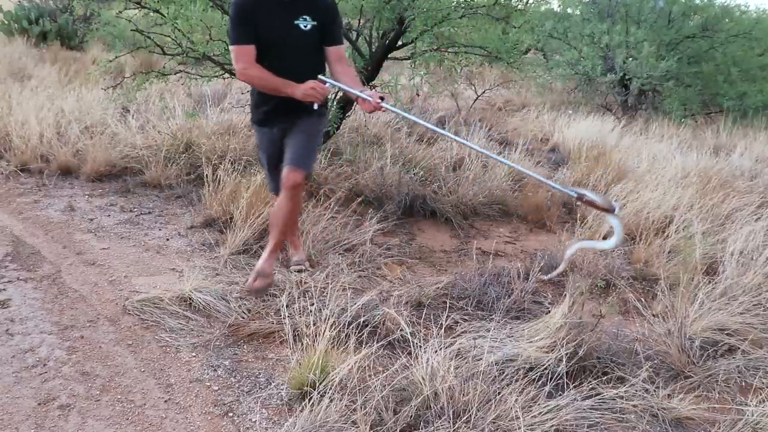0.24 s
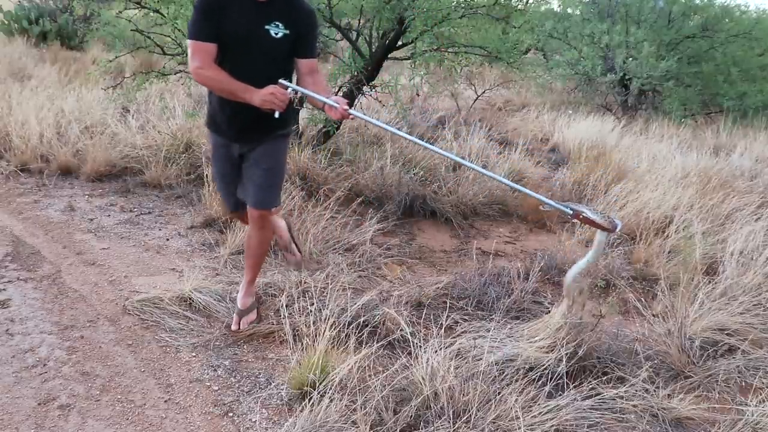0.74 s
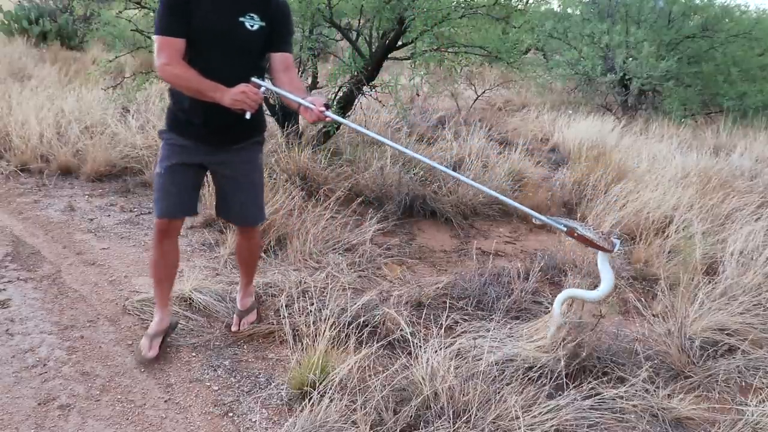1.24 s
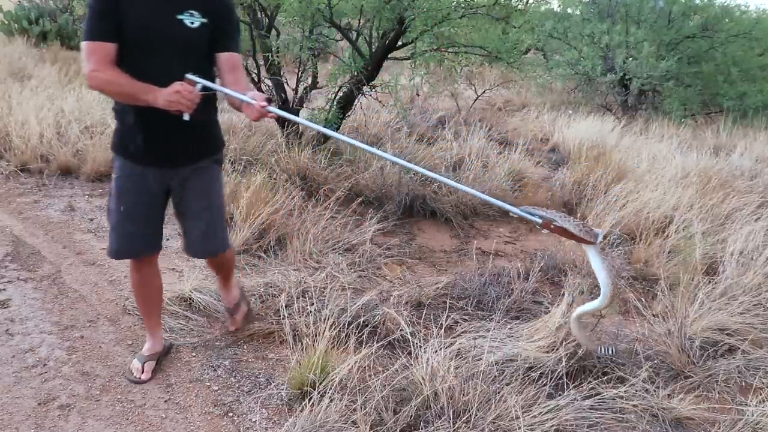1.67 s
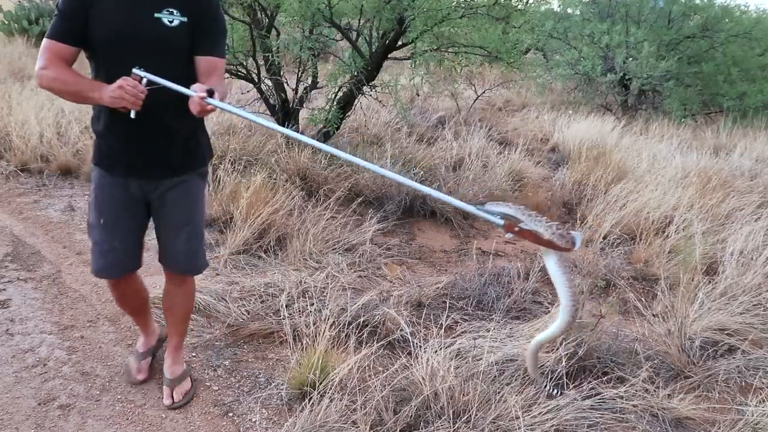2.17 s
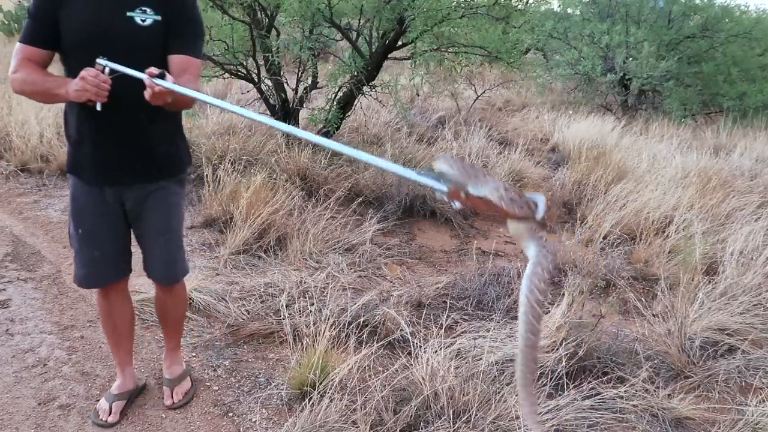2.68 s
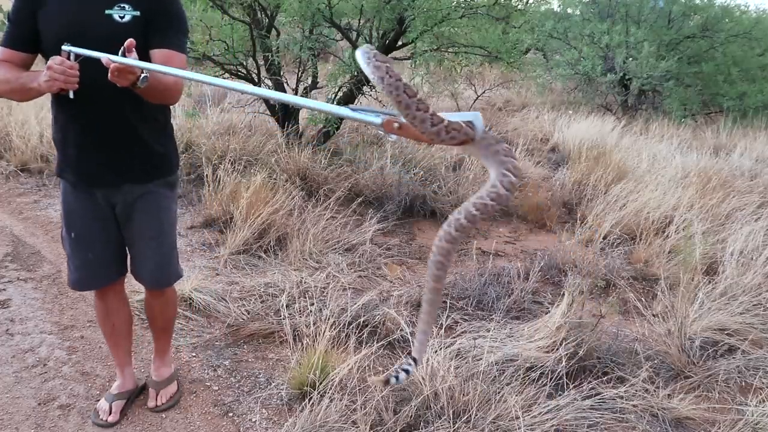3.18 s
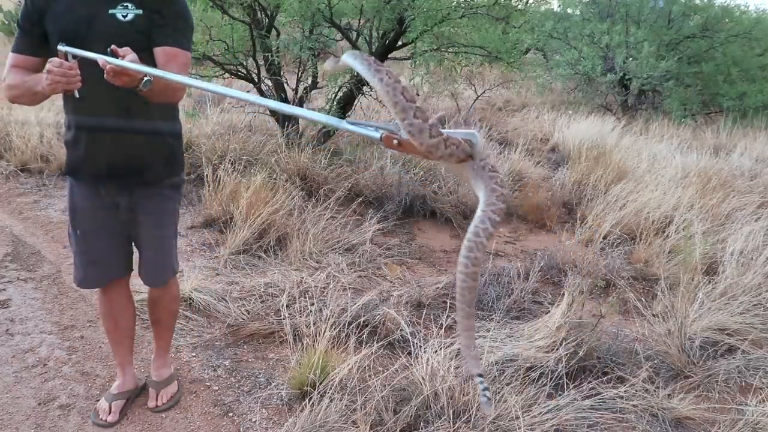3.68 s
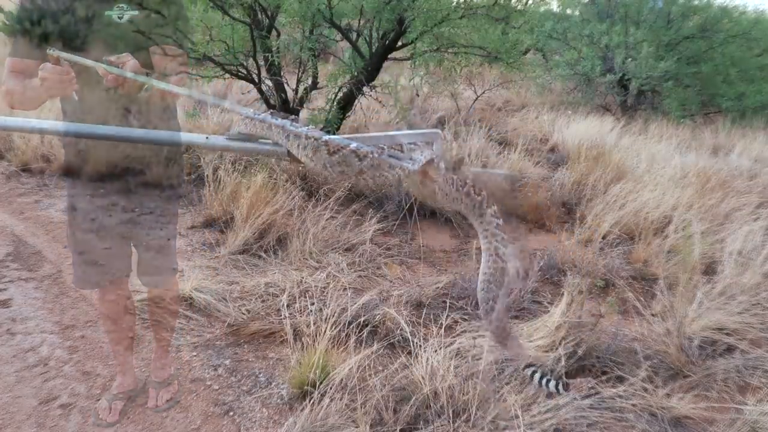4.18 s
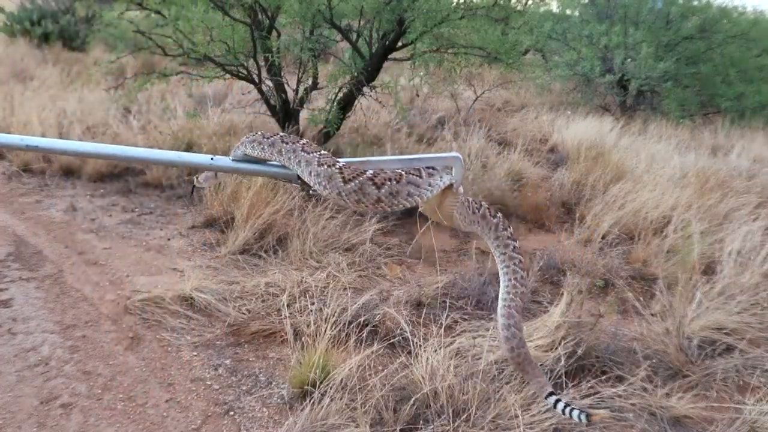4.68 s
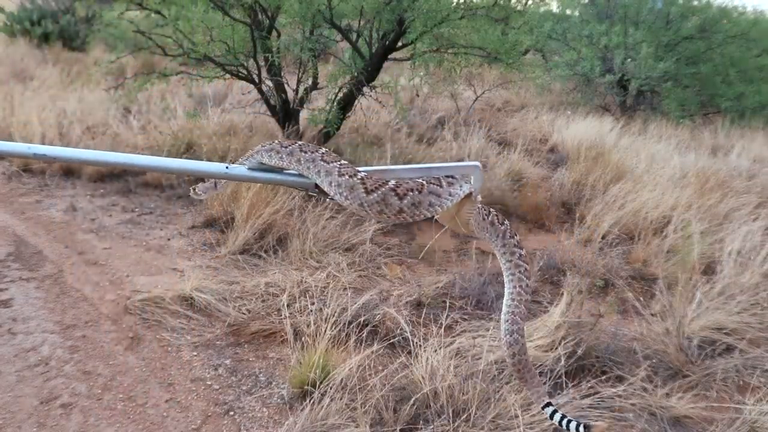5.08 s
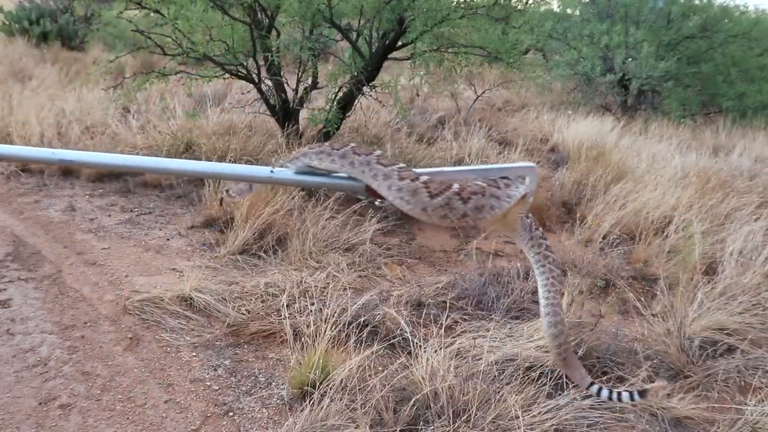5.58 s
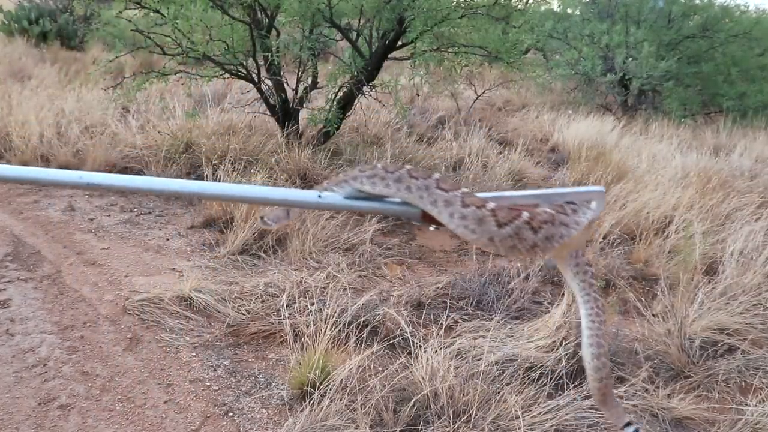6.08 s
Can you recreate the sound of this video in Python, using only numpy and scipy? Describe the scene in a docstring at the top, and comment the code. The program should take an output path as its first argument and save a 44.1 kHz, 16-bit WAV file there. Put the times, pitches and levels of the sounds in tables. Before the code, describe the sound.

A rattlesnake rattles without pause, close to the microphone: a dense, dry, high buzz, briefly coloured by a sweeping ground reflection. Beneath it sandals scuff grit, dry stalks crack and grass swishes. Around four seconds the buzz blends into coarser, separate shakes, still very fast. More grass, grit and snaps come near the end. Quiet open air, mono, very little reverberation.

```python
"""Rattlesnake on a pole

A rattlesnake, lifted on a pole, rattles close by: clusters of random clacks ring hollow horn segments.
A tight buzz, at times with a ground echo, gives way to separate shakes about 25 times a second.
Sandals scuff and slap as dry stalks snap: grit impacts, splinter noise and single knocks, each coloured.
Grass swishes in small ticks; quiet outdoor air is shaped noise, with a faint hum of wavering sines.
"""
import sys
import numpy as np
from scipy import signal
from scipy.fft import rfft, irfft, next_fast_len
from scipy.io import wavfile
from scipy.ndimage import map_coordinates

SR = 44100
rng = np.random.default_rng(int(sys.argv[2]) if len(sys.argv) > 2 else 0)


def inscribe(sig):
    """Save sig as 16-bit PCM at rate SR to the path in sys.argv[1].

    A 1-D sig is mono; a 2-D sig holds one channel per row.
    Samples are clipped to [-1, 1] before scaling.
    """
    pcm = np.round(np.clip(np.atleast_2d(sig).T, -1, 1) * 32767)
    wavfile.write(sys.argv[1], SR, pcm.astype(np.int16))


N = 279153
T = np.arange(N) / SR  # s


def amp(db):
    """Decibels to gain."""
    return 10 ** (np.asarray(db) / 20)


def unit(x):
    """Scale to rms 1."""
    return x / np.sqrt(np.mean(x ** 2) + 1e-20)


def curves(rows):
    """Interpolate each column after the time to one value per sample."""
    time_s, *columns = np.transpose(rows)
    return [np.interp(T, time_s, column) for column in columns]


def wobble(knots_per_s):
    """Smooth random curve through normally distributed knots."""
    knots = rng.standard_normal(int(N * knots_per_s / SR) + 4)
    return map_coordinates(knots, [T * knots_per_s])


def filtered(x, response):
    """Multiply the spectrum of x by a response of frequency in Hz."""
    size = next_fast_len(N + SR // 2)
    hz = np.fft.rfftfreq(size, 1 / SR)
    return irfft(rfft(x, size) * response(hz), size)[:N]


def coloured(x, points, size=4096):
    """Ring x through a causal, minimum-phase body of unit energy with the given spectrum."""
    point_hz, point_db = np.transpose(points)
    hz = np.fft.rfftfreq(size, 1 / SR)
    shape = amp(np.interp(np.log(hz + 1), np.log(point_hz), point_db))
    shape = shape * np.minimum(1, (hz + 1) / point_hz[0]) ** 2  # roll off below the first point
    # a one-sided cepstrum gives minimum phase
    cepstrum = irfft(np.log(shape + 1e-6))
    cepstrum[1:size // 2] *= 2
    cepstrum[size // 2 + 1:] = 0
    ring = irfft(np.exp(rfft(cepstrum)))
    return signal.fftconvolve(x, ring / np.linalg.norm(ring))[:N]


def contacts(per_second, scatter_db):
    """Tiny impacts at random moments, of scattered size and random sign, rms 1."""
    hit = rng.random(N) < per_second / SR
    size = amp(scatter_db * np.clip(rng.standard_normal(N), -2, 2))
    return unit(hit * size * rng.choice([-1, 1], N))


# tail flicks in the buzz: (time [s], rate [flicks/s])
FLICK_RATE = [(0, 167), (1.25, 170), (1.6, 160), (2.05, 159), (2.5, 165), (3.3, 154)]
# flicks stand out more as the snake comes nearer
SWING_DB, SWING_GROWTH_DB_PER_S = 1.34, 0.23


def buzz():
    """Each flick throws the segments together in a tight cluster of clacks."""
    flicks = np.cumsum(curves(FLICK_RATE)[0]) / SR + .045 * wobble(70)
    swing_db = (SWING_DB + SWING_GROWTH_DB_PER_S * T) * np.cos(2 * np.pi * flicks)
    waves_db = .7 * np.cos(6 * np.pi * flicks)  # segments meet in three waves per flick
    return_db = .4 * np.cos(np.pi * flicks)  # outward and return flicks differ in force
    force = amp(swing_db + waves_db + return_db + 0.42 * wobble(60))
    return unit(force * contacts(per_second=6500, scatter_db=1.4))


def segments(clacks, shell, bright_db):
    """Clacks ring hollow horn; segment sizes and clack hardness mix, so each register flickers on its own."""
    ring = coloured(clacks, shell)
    top = filtered(ring, lambda hz: 1 / (1 + (9300 / (hz + 1)) ** 8))
    low = filtered(ring, lambda hz: 1 / (1 + (hz / 4300) ** 10))
    middle = ring - top - low
    lean_db = .9 * wobble(130)
    body = amp(lean_db) * low + amp(-lean_db) * middle
    return unit(body) + amp(bright_db + 0.48 * wobble(150)) * unit(top)


# rattle as the snake turns and swings:
# (time [s], relative level [dB], relative level of the top register [dB])
RATTLE_LEVEL = [(0.0, -22.5, -9.5), (0.45, -22, -7), (0.56, -23.5, -5), (0.63, -22.5, -13),
                (0.93, -23.5, -9.5), (0.99, -23, -4), (1.24, -21, -8), (1.59, -22.5, -7.5),
                (1.92, -18.5, -8), (2.13, -18.5, -5.5), (2.66, -19, -7), (2.68, -17.5, -10),
                (3.01, -19, -4), (3.78, -20, -3), (4.18, -22.5, -7.5), (4.69, -18, -10),
                (5.67, -19.5, -11.5), (6.28, -20, -18)]
# segment ring in the buzz: (frequency [Hz], relative level [dB])
SHELL_BUZZ = [(1500, -32), (2200, -26.5), (2900, -3.5), (3700, -3.5), (4300, -0.5), (4750, -0.5), (5300, 0),
              (6700, -7), (7400, -9.5), (9800, -10), (10800, -5), (13600, -2.5), (14700, -19), (15800, -8)]
# segment ring in slow shakes, with their dull body: (frequency [Hz], relative level [dB])
SHELL_SHAKES = [(500, -40), (1250, -25), (2100, -29), (2850, -3.5), (3600, -6), (4250, -1), (4750, -3),
                (5250, -1), (6700, -7.5), (7400, -11), (9800, -13.5), (10800, -9.5), (13600, -12.5),
                (14900, -23.5)]
# two passes over bare ground; echo delay follows tail height: per pass (time [s], delay [ms])
GROUND_DELAY = [
    [(0, .96), (.15, 1.38), (.23, 1.34), (.37, .92), (.61, 1.21), (.71, 1.26), (.78, 1.2)],
    [(1.8, 1.58), (2.15, 1.97), (2.33, 2.23), (2.44, 2.48)],
]
ECHO_RATIO, ECHO_FADE_S = 0.54, .1  # amplitude before dulling; fade at the edge of the grass
BLEND_S = 0.75  # buzz to slow shakes


def rattle():
    """Buzz, then slow shakes; bare ground returns a duller copy whose delay sweeps as the tail moves."""
    level_db, bright_db = curves(RATTLE_LEVEL)
    slow = np.sin(np.pi / 2 * np.clip((T - SHAKE_RATE[0][0]) / BLEND_S, 0, 1))
    fast_part = np.sqrt(1 - slow) * segments(buzz(), SHELL_BUZZ, bright_db + .2)
    slow_part = np.sqrt(slow) * segments(shaking(), SHELL_SHAKES, bright_db + 0.54)
    direct = amp(level_db + 0.56) * (fast_part + slow_part)

    delay_ms, = curves(np.vstack(GROUND_DELAY))
    strength = np.zeros(N)
    for rows in GROUND_DELAY:
        start_s, end_s = rows[0][0], rows[-1][0]
        edges_s = [start_s - ECHO_FADE_S, start_s, end_s, end_s + ECHO_FADE_S]
        strength += ECHO_RATIO * np.interp(T, edges_s, [0, 1, 1, 0])
    echo = map_coordinates(direct, [(T - delay_ms / 1000) * SR])
    echo = filtered(echo, lambda hz: 1 / np.sqrt(1 + (hz / 9500) ** 6))
    return (direct + strength * echo) / np.sqrt(1 + strength ** 2)


# air spectrum: (frequency [Hz], relative level [dB])
AIR_SPECTRUM = [(20, -1), (60, 1), (110, -1), (250, -0.5), (500, -1.5), (1000, 2), (3000, -14.5)]
# hum partials: (frequency [Hz], relative level [dB])
HUM_PARTIALS = [(59.5, -8), (236.9, -6), (355.3, -9), (586.8, -9.5)]
BACKGROUND_GAIN_DB = -56.5
LULL_S, LULL_DB, LULL_FALL_S, LULL_RETURN_S = 4.02, -8.5, 2.2, 0.34


def background():
    """Soft air noise and faint, slightly unsteady hum; both sink slowly into one lull and return."""
    air = coloured(rng.standard_normal(N), AIR_SPECTRUM) * amp(0.38 * wobble(2.8))
    hum = sum(amp(db) * np.sin(2 * np.pi * hz * T + .5 * wobble(4.98)) for hz, db in HUM_PARTIALS)
    lull = np.interp(T, [LULL_S - LULL_FALL_S, LULL_S, LULL_S + LULL_RETURN_S], [0, 1, 0])
    return amp(BACKGROUND_GAIN_DB + LULL_DB * lull) * (amp(4.5) * air + amp(1) * hum)


def swell(middle_s, length_s):
    """Gaussian rise and fall, peak 1, length between the 1/e points."""
    return np.exp(-(2 * (T - middle_s) / length_s) ** 2)


# grass against legs and snake: (middle [s], length [s], relative level [dB])
GRASS_SWISHES = [(.05, 0.99, -48.5), (0.704, 0.26, -49), (.92, 0.13, -52), (1.12, 0.12, -46.5),
                 (1.914, 1, -46.5), (2.677, 0.35, -44), (3.21, 0.69, -51.5), (4.36, 0.32, -52.5),
                 (5.52, 0.18, -48.5), (5.95, 0.37, -44)]
# blade spectrum: (frequency [Hz], relative level [dB])
GRASS_SPECTRUM = [(150, -31), (400, -9.5), (750, -6.5), (1200, 4.5), (1600, 0), (2500, 5), (6000, -32)]
STIR_RELATIVE_DB = -62.5  # blades stirring between swishes


def grass():
    """Dry blades rub in many small ticks, swelling with each swish."""
    ticks = contacts(per_second=900, scatter_db=4.5) * amp(0.98 * wobble(40))
    swishes = sum(amp(db) * swell(middle_s, length_s) for middle_s, length_s, db in GRASS_SWISHES)
    push = amp(STIR_RELATIVE_DB) + swishes
    return amp(4.0) * push * unit(coloured(ticks, GRASS_SPECTRUM))


# soles grinding on grit, exponential flanks:
# (peak time [s], relative level [dB], rise constant [s], fall constant [s])
SOLE_SCUFFS = [(0.471, -35, 0.015, 0.041), (.66, -45.5, 0.085, 0.16), (1.55, -46.5, .06, 0.09),
               (2.063, -23.5, 0.013, 0.017), (2.12, -41, 0.028, 0.11), (2.523, -34.5, 0.019, 0.017),
               (3.233, -40, 0.022, .03), (3.35, -44, 0.019, 0.033), (4.279, -39, 0.027, 0.038),
               (5.761, -39, 0.0051, .043), (5.845, -30.5, 0.025, 0.047), (6.111, -35, 0.021, 0.014),
               (6.272, -24.5, 0.014, .024)]
# stalks snapping: (time [s], relative level [dB])
STALK_SNAPS = [(0.646, -21), (0.676, -24), (0.709, -26), (0.796, -17), (1.428, -21), (2.033, -19),
               (2.143, -14.5), (2.53, -9), (2.733, -23.5), (2.9, -23), (3.347, -26), (5.755, -24),
               (5.945, -18.5), (6.038, -17.5), (6.112, -22), (6.261, -10.5)]
# sandals slapping: (time [s], relative level [dB])
SANDAL_SLAPS = [(0.471, -31), (1.771, -25), (2.032, -24), (2.521, -25), (6.112, -32), (6.273, -28)]
# spectra of grit, stalk and sole: (frequency [Hz], relative level [dB])
GRIT_SPECTRUM = [(50, -34), (140, -11.5), (350, -8), (700, 3.5), (1300, 4.5), (2200, -2), (5000, -7.5),
                 (14000, -34)]
STALK_SPECTRUM = [(200, -23), (600, 6.5), (1300, 16), (1900, 9.5), (2600, 5), (6000, -10), (14000, -35)]
SOLE_SPECTRUM = [(90, -6), (140, 2), (230, -2), (400, 5), (700, 7), (1500, -23), (4000, -54)]
CRACK_T60_S = 0.005  # splintering decay by 60 dB


def footsteps():
    """Grit crunches under weight; stalks snap and splinter; sandals slap."""
    weight = np.zeros(N)
    for peak_s, db, rise_s, fall_s in SOLE_SCUFFS:
        decay = np.where(T < peak_s, (peak_s - T) / rise_s, (T - peak_s) / fall_s)
        weight += amp(db) * np.exp(-decay)
    crunch = coloured(weight * contacts(per_second=700, scatter_db=3), GRIT_SPECTRUM)

    snaps, slaps = np.zeros(N), np.zeros(N)
    for time_s, db in STALK_SNAPS:
        start = round(time_s * SR)
        snaps[start] += amp(db)
        splinter_db = db - 22 - 60 * T[:N - start] / CRACK_T60_S
        snaps[start:] += amp(splinter_db) * rng.standard_normal(N - start)
    for time_s, db in SANDAL_SLAPS:
        slaps[round(time_s * SR)] = amp(db)
    snapping = amp(12.0) * coloured(snaps, STALK_SPECTRUM)
    slapping = amp(17.5) * coloured(slaps, SOLE_SPECTRUM)
    return amp(5.0) * crunch + snapping + slapping


# slow shaking: (time [s], rate [shakes/s])
SHAKE_RATE = [(3.9, 22.87), (4.22, 26.47), (4.52, 22.72), (4.85, 26.39), (5.75, 24.63), (6.2, 26.08)]
FLUTTER_HZ, FLUTTER_DB = 86.2, 1.3  # tail tip within each shake


def shaking():
    """Each shake is a burst of clacks that builds up and stops abruptly, clumped as segments rebound."""
    turns = np.cumsum(curves(SHAKE_RATE)[0] * (T >= SHAKE_RATE[0][0])) / SR
    angle = 2 * np.pi * (turns + .035 * wobble(45))
    swing = np.tanh(2.8 * (np.cos(angle + .12) + .15 * np.sin(2 * angle) + .08))
    # segments settle between shakes, sometimes more fully
    settle_db = (4.3 + 1.3 * wobble(40)) * (swing - 1)
    flutter_db = FLUTTER_DB * np.cos(2 * np.pi * FLUTTER_HZ * T + wobble(6))
    rebounds_db = 2.2 * np.tanh(wobble(480))
    force = amp(settle_db + flutter_db + rebounds_db)
    return unit(force * contacts(per_second=9000, scatter_db=3.0))


def scene():
    """Snake, grass, feet and open air, in one channel."""
    return (rattle() + grass() + footsteps() + background())[None]


TOP_HZ = 15850


def record(dry):
    """Band-limit: nothing passes from TOP_HZ up."""
    return filtered(dry[0], lambda hz: hz < TOP_HZ)[None]


dry = scene()
out = record(dry)
inscribe(out)
```